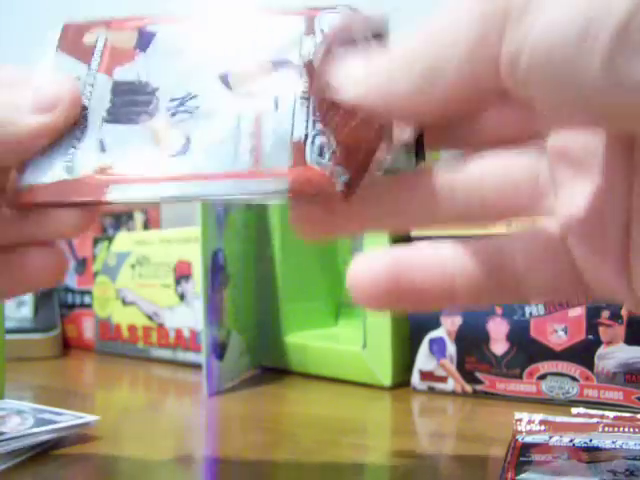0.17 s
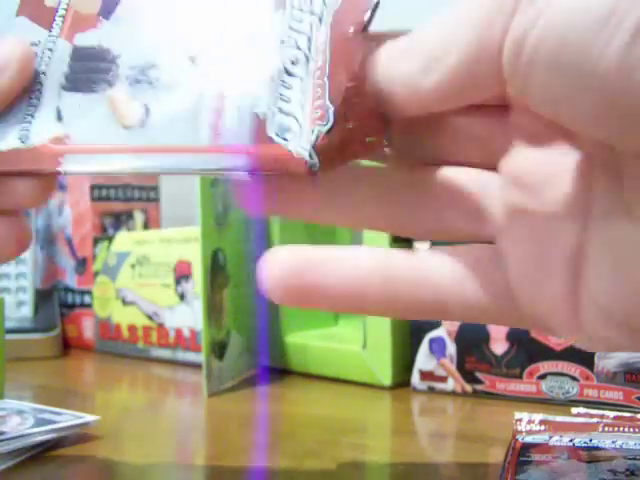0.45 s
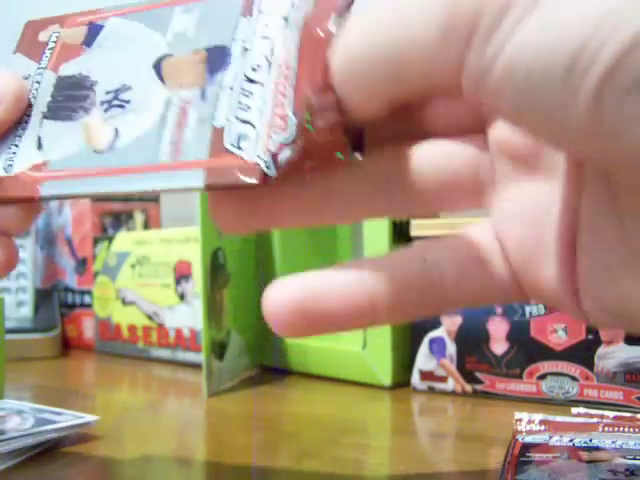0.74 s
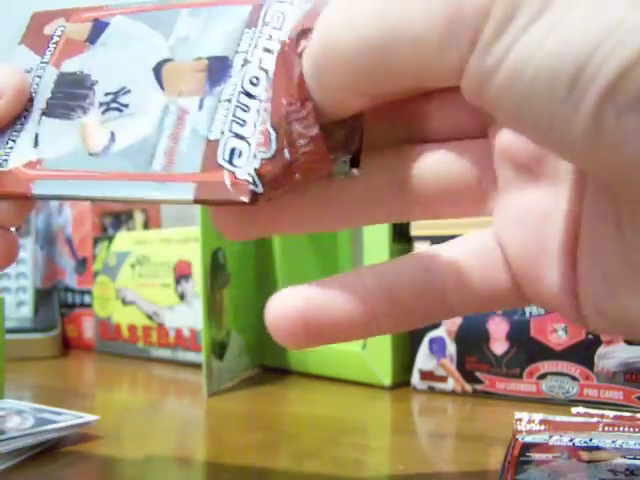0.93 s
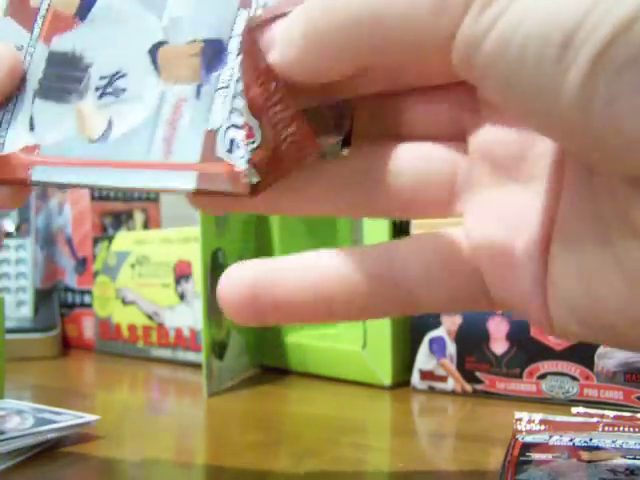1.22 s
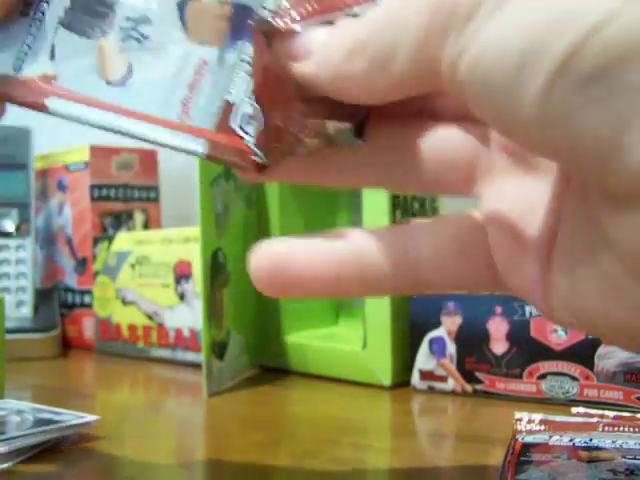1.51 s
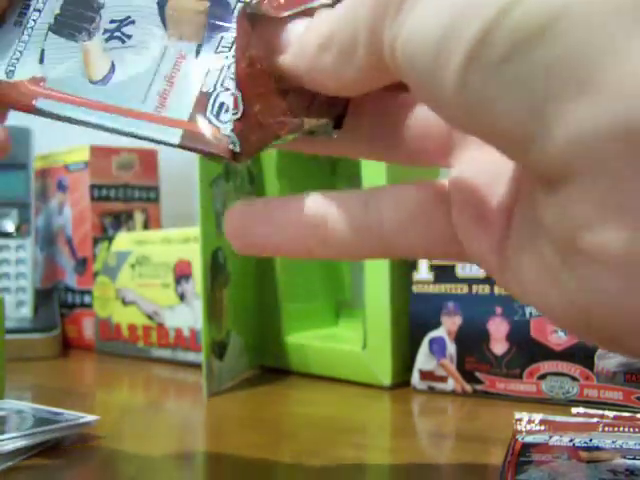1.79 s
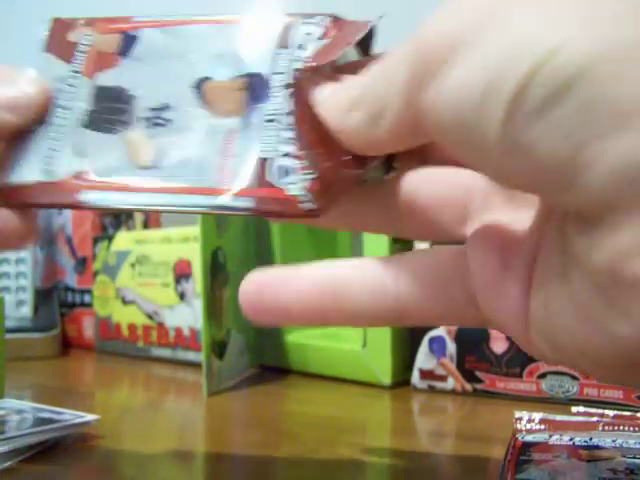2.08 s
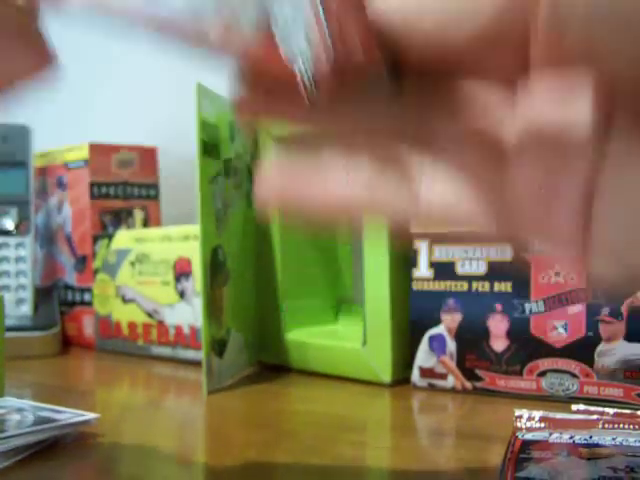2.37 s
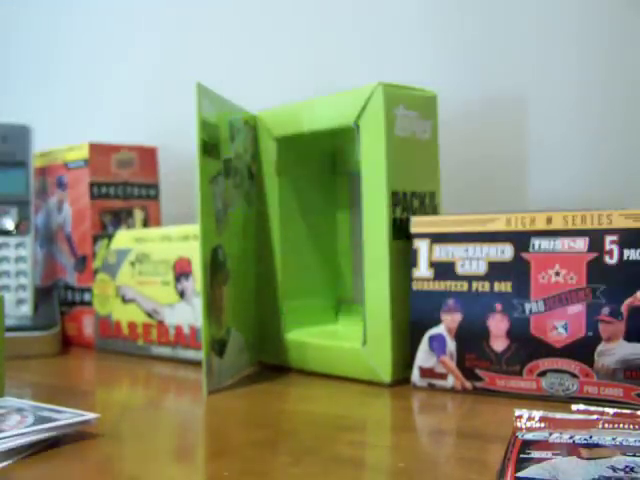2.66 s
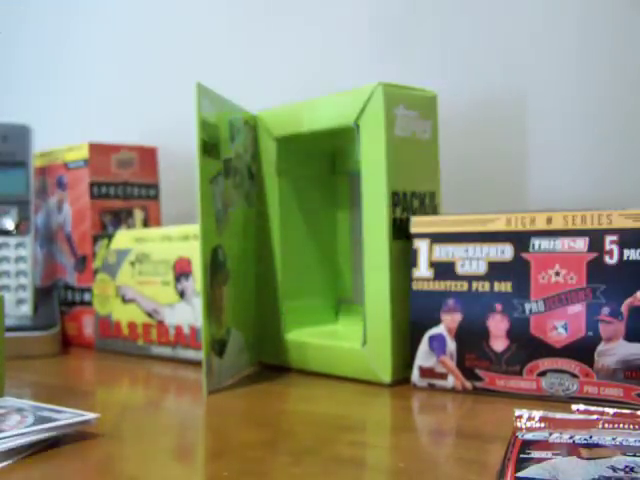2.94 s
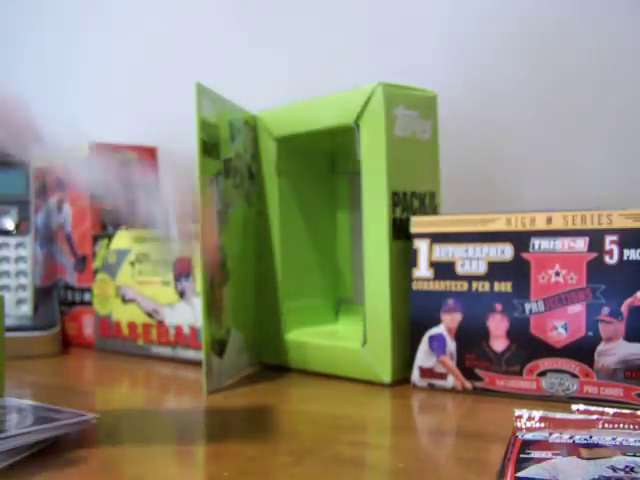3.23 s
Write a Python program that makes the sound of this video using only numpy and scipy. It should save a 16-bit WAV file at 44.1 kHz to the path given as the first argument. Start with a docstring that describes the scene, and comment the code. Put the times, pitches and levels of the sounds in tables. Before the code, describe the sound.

A foil card pack is opened by hand close to a small microphone in a small room: a hard seam crack early, scattered crinkles, a quiet lull, then dense snapping and final sliding rustles.

```python
"""Over a faint steady background, cards slide on foil, then sharp creases snap: a card pack is opened by hand.
It is close to a small microphone, over a table in a small room. Snaps are kicks ringing resonant foil facets,
pulls set off swarms of tiny kicks, slides are gritty noise, and buckling panels knock with short sine rings.
The seam is a burst of noise, fingertips rub as dull noise, and the room adds early reflections and a soft tail.
The hardest snaps overload the microphone."""
import sys
import numpy as np
from scipy import signal
from scipy.fft import rfft, irfft
from scipy.io import wavfile
from scipy.ndimage import uniform_filter1d

SR = 44100
rng = np.random.default_rng(int(sys.argv[2]) if len(sys.argv) > 2 else 0)


def bounce(signal):
    """Save signal as a 16-bit WAV file at the path given by the first command-line argument."""
    frames = np.transpose(np.atleast_2d(signal))
    limited = np.clip(frames, -1, 1)
    pcm = np.round(limited * 32767).astype(np.int16)
    wavfile.write(sys.argv[1], SR, pcm)


N = 147735
TIME = np.arange(N) / SR
HZ = np.fft.rfftfreq(2048, 1 / SR) + 1  # spectrum grid, kept above zero for the logarithms

LEAD = 260  # samples of creaking strain ahead of a crease's kick
FLUTTER_S, FLUTTER_DB = 0.0018, 10.5  # decay after the kick, energy against the kick
SNAP_S = 0.0043  # time over which a snap's level counts
RUB_ATTACK_S, RUB_RELEASE_S = 0.02, 0.012  # shared by slides and fingertips


def amp(db):
    """Decibels to gain."""
    return 10 ** (np.asarray(db) / 20)


def unit(x):
    """Scales to an energy of one."""
    return x / np.sqrt(np.sum(x ** 2) + 1e-20)


def read(points, hz):
    """Reads a table on a log-frequency axis."""
    f, value = np.transpose(points)
    return np.interp(np.log(hz + 1), np.log(f), value)


def add(mix, s, sound):
    """Mixes a sound in at time s, cutting it off at the end of the mix."""
    part = mix[max(round(s * SR), 0):][:len(sound)]
    part += sound[:len(part)]


def noise(hz, db, level=1):
    """White noise follows a level curve, then takes on the given spectrum."""
    gain = amp(np.interp(np.fft.rfftfreq(N, 1 / SR), hz, db))
    gain = unit(gain) * np.sqrt(len(gain))
    return irfft(rfft(level * rng.standard_normal(N)) * gain, N)


def gesture(start, length, attack, release):
    """A hand movement's envelope: rises, holds, then dies away."""
    rise = np.clip((TIME - start) / attack, 0, 1)
    return rise * np.exp(-np.maximum(TIME - start - length, 0) / release)


def colour(body_db, treble_db, body_hz=750, treble_hz=5300):
    """The foil's spectrum in dB, with a broad hump for body and a shelf for treble."""
    # colour of the foil at the microphone: frequency_hz [Hz], level_db [relative dB]
    foil = [(60, -35), (150, -21), (300, -19), (750, -11), (1100, -13), (1900, -7), (2500, -9), (3300, -1),
            (4200, -1.5), (5300, -5.5), (7000, -8), (8000, -19), (8700, -33), (9700, -70.5)]
    body = body_db * np.exp(-.5 * np.log2(HZ / body_hz) ** 2)
    treble = treble_db / (1 + (treble_hz / HZ) ** 10)
    return read(foil, HZ) + body + treble


def facet(ring_hz, body_db, treble_db, drive):
    """One stiff facet of foil, with its own broad resonance, answers a drive; energy one."""
    peak_db, width_octaves = 7, 0.21
    resonance = peak_db * np.exp(-.5 * (np.log2(HZ / ring_hz) / width_octaves) ** 2)
    db = colour(body_db, treble_db) + resonance
    # a minimum-phase response puts the energy at the front, so the attack stays crisp
    log_gain = np.log(amp(np.r_[db, db[-2:0:-1]]))
    click = np.fft.ifft(np.exp(np.conj(signal.hilbert(log_gain)))).real
    return unit(signal.fftconvolve(drive, click[:len(HZ)]))


def flip(size=700):
    """A crease creaks under strain, flips with one sharp kick LEAD samples in, then flutters."""
    strain_s, strain_db = 0.003, -9.5  # build-up time, energy against the kick
    t = (np.arange(size) - LEAD) / SR
    grit = rng.standard_normal(size)
    flutter = amp(FLUTTER_DB) * unit(grit * (t >= 0) * np.exp(-abs(t) / FLUTTER_S))
    strain = amp(strain_db) * unit(grit * (t < 0) * np.exp(-abs(t) / strain_s))
    kick = t == 0
    return (flutter + strain + kick) * rng.choice([-1, 1])


def background():
    """Steady noise with a fixed spectrum lies under everything."""
    # steady background: frequency_hz [Hz], density_db [relative dB per Hz]
    floor_shape = [(25, -4), (400, -3.5), (1000, -10.5), (2000, -8.5), (4000, -7), (7000, -15), (8300, -24),
                   (9500, -74)]
    return amp(-51.5) * noise(HZ, read(floor_shape, HZ))


def slides():
    """Cards and fingers slide on the foil: fine, gritty friction radiated by the wrapper."""
    # slides: start_s [s], length_s [s], level_db [dB before trim], treble_db [dB]
    slide_list = [(-.02, 0.06, -42.5, -5), (0.113, 0.23, -38.5, -5), (0.301, .17, -42.5, -2),
                  (0.506, .11, -35, 1.5), (0.728, 0.067, -36.5, 1), (0.872, 0.074, -37, -8),
                  (1.268, 0.051, -37.5, -3), (2.534, 0.086, -41.5, -6), (2.783, 0.067, -35, -1),
                  (2.915, 0.091, -32.5, -7.5), (3.097, 0.067, -41, -7.5), (3.175, 0.037, -42, 7)]
    body_db, rough_db, trim_db = -1.5, 4.5, -0.5
    # slowed noise, read as decibels, makes the friction catch and release
    wander = np.sqrt(N) * unit(uniform_filter1d(rng.standard_normal(N), size=70))
    grip = np.sqrt(N) * unit(amp(rough_db * wander))
    out = np.zeros(N)
    for start, length, db, treble in slide_list:
        stroke = gesture(start, length, RUB_ATTACK_S, RUB_RELEASE_S)
        out += noise(HZ, colour(body_db, treble), amp(db + trim_db) * grip * stroke)
    return out


def crackle(count=14):
    """Each pull crumples the foil, setting off a swarm of tiny snaps on facets of many sizes."""
    # pulls: start_s [s], length_s [s], level_db [dB], ring_hz [typical facet resonance, Hz]
    pulls = [(0.059, 0.044, -28.5, 4400), (.177, 0.106, -27, 3700), (0.299, 0.15, -35, 2700),
             (0.529, 0.068, -35, 2600), (1.302, 0.018, -20.5, 2450), (1.426, 0.034, -31, 2970),
             (1.507, 0.049, -33.5, 1960), (2.089, 0.053, -28, 2600), (2.244, 0.018, -27, 2900),
             (2.332, 0.074, -34.5, 3370), (2.609, 0.022, -22.5, 4500), (2.649, 0.058, -32, 5200),
             (2.705, 0.067, -22, 4600), (2.862, 0.15, -33, 3440), (2.985, 0.025, -25.5, 4800)]
    attack_s, release_s = 0.0008, .004
    crackles_per_s, reference_db = 420, -31.5  # harder pulls than the reference crackle faster
    spread_db, tilt_db = 7.5, 2  # variation in kick size, variation in body and treble
    middle_hz, body_db_per_octave = 3820, 3  # larger facets ring lower and have more body
    out = np.zeros(N)
    for start, length, db, hz in pulls:
        effort = gesture(start, length, attack_s, release_s)[round(start * SR):][:SR // 4]
        body = body_db_per_octave * np.log2(middle_hz / hz)
        rate = crackles_per_s * amp(db - reference_db)
        swarm = 0
        for _ in range(count):  # each facet takes its share of the kicks
            chance = rng.random(len(effort))
            size = np.minimum(rng.exponential(1, len(effort)), 2)
            kicks = effort * (chance < rate / count / SR) * amp(spread_db * size)
            ring, low, high = rng.standard_normal(3)
            ring_hz = hz * 2 ** (.5 * ring)
            tiny_snap = facet(ring_hz, body + tilt_db * low, tilt_db * high - 3, flip())
            swarm = swarm + signal.fftconvolve(kicks, tiny_snap)
        add(out, start - LEAD / SR, amp(db) * np.linalg.norm(effort) * unit(swarm))
    return out


def snaps():
    """Single creases flip over, each kick ringing its own facet of foil."""
    # creases: time_s [s], level_db [dB before trim], ring_hz [Hz], body_db [dB], treble_db [dB]
    creases = [(0.062, -17.5, 3600, 8.5, 6), (0.0709, -21, 5100, -3.5, 4), (0.0927, -21.5, 4700, -4, 9),
               (0.1263, -27, 4670, -6, 11.5), (0.2774, -15, 3160, 2, -7), (0.3527, -22.5, 2920, 11, 11),
               (0.3884, -20.5, 2880, -3, -11), (0.405, -15, 4700, -4, 1.5), (0.4191, -20.5, 3500, 8, 5),
               (0.5897, -25.5, 1950, 6, 1), (0.6122, -29, 5040.0, 2.5, 1), (0.654, -33.5, 4600, 8, 9),
               (0.682, -31.5, 3370, -3.5, -7), (0.8807, -21, 6200, 9, 13.5), (1.1931, -32.5, 3800, 2, 1.5),
               (1.3051, -20, 4300, -13, -9.5), (1.325, -23.5, 3470, -7, 0), (1.3494, -21.0, 3270, -6, 5),
               (1.3775, -15, 2580, 1, 1.5), (1.4259, -21, 5860, 6.5, 2), (1.4459, -22, 4830, 17, 9.5),
               (1.4968, -19.5, 3630, -3, 9), (1.5724, -18, 3300, -9, -6), (1.5812, -18.5, 4750, 3.5, 2),
               (1.6267, -26, 6060, 8, -1), (1.726, -32, 4610.0, 8, -3.5), (1.8237, -26, 5460, -3, 1),
               (1.953, -44, 5000, -8, 9), (2.006, -29, 5730, 4, 3.5), (2.0236, -24.5, 5770.0, 2.5, -3),
               (2.0581, -13.5, 3500, -17, -6), (2.1292, -10, 3720, -18, -6), (2.1683, -18, 2800, -5, 0.5),
               (2.209, -20.5, 5380.0, -2, 3), (2.2193, -18, 4200, 3.5, 5), (2.25, -17, 3100, -10, -7.5),
               (2.2649, -17, 4800, 1, 5), (2.317, -22, 3700, 3.5, 5), (2.3296, -22.5, 4100, 7, 3),
               (2.343, -17.5, 3160, 1, -1), (2.377, -20.5, 3600, 12, 2), (2.3893, -16, 3940, 2, 7),
               (2.453, -25.5, 6730, 3, 9.5), (2.4625, -24.5, 6030, -2, 2), (2.4751, -25, 4650.0, -8, 5),
               (2.4846, -26.5, 5560.0, -1.5, 4.5), (2.5071, -28, 7660, 4, 10.5),
               (2.5972, -22.5, 4290, -4, -2), (2.6329, -20.5, 760, 7, 2), (2.6793, -24.5, 4450, -18, 1),
               (2.6956, -13.5, 5220, -4, 7.5), (2.7102, -18.5, 3790.0, -16, -15),
               (2.7206, -15.5, 3120, -14, 0), (2.7332, -15, 3340, -10, -22.5),
               (3.0055, -16.5, 7100, 1.5, -4.5), (3.0572, -19, 3930, -15, -6), (3.179, -27, 5840, 2, 4.5),
               (3.2623, -32.5, 1450, 7.5, -31), (3.3242, -35, 1810.0, 15, -9)]
    trim_db = -0.5
    out = np.zeros(N)
    for s, db, hz, body, treble in creases:
        level = amp(db + trim_db) * np.sqrt(SNAP_S * SR)
        add(out, s - LEAD / SR, level * facet(hz, body, treble, flip()))
    return out


def pops():
    """A broad panel of the pack buckles: a small foil click and a short hollow ring."""
    # buckles: time_s [s], level_db [dB], ring_hz [Hz]
    buckles = [(.067, -38, 85), (0.183, -34, 79), (.183, -25.5, 1170), (.277, -29.5, 735),
               (.352, -30.5, 430), (.546, -35, 837), (0.596, -38.5, 710), (0.9039, -28.5, 1876),
               (1.362, -28.5, 1720), (1.3712, -35, 974), (1.578, -33, 472), (2.0596, -26, 2170),
               (2.121, -31.5, 840), (2.17, -23, 1960), (2.425, -35, 1810), (2.62, -34, 776),
               (2.72, -40.5, 233), (2.877, -27.5, 1070)]
    ring_s = .0014  # both the swell and the decay of the knock
    click_db = 1  # crisp foil against the hollow knock
    t = TIME[:len(HZ)]
    out = np.zeros(N)
    for s, db, hz in buckles:
        level = amp(db) * np.sqrt(SNAP_S * SR)
        knock = np.sin(2 * np.pi * hz * t) * t / ring_s * np.exp(-t / ring_s)
        add(out, s, level * unit(knock))
        add(out, s - LEAD / SR, level * amp(click_db) * facet(hz, 0, -5.5, flip()))
    return out


def seam():
    """The seam gives way in one hard crack: a brief burst of noise rings a facet."""
    # seam: time_s [s], level_db [dB], ring_hz [Hz], body_db [dB], treble_db [dB], length_s [s]
    s, db, hz, body, treble, length = (.1823, -6, 3400, -7, -4, .0036)
    burst = gesture(0, length, 1 / SR, FLUTTER_S / 2)[:len(HZ)]
    rip = rng.standard_normal(len(HZ)) * burst
    out = np.zeros(N)
    add(out, s, amp(db) * np.sqrt(length * SR) * facet(hz, body, treble, rip))
    return out


def fingers():
    """Fingertips shift their grip: dull, soft rubs of skin on the wrapper."""
    # grips: start_s [s], length_s [s], level_db [dB], ring_hz [broad hump of the pack, Hz]
    grips = [(0.944, 0.73, -55.5, 800), (2.315, 0.21, -49.5, 399), (2.585, .17, -45.5, 342)]
    out = np.zeros(N)
    for start, length, db, hz in grips:
        hump_db = 20 * np.log10(HZ / hz / (1 + (HZ / hz) ** 4))
        stroke = gesture(start, length, RUB_ATTACK_S, RUB_RELEASE_S)
        out += noise(HZ, hump_db, amp(db) * stroke)
    return out


def room(x):
    """A few early reflections and a diffuse noise tail that dies band by band."""
    # decay: frequency_hz [Hz], t60_s [s to fall 60 dB]
    decay = [(200, 0.77), (1000, 0.45), (3500, 0.78), (8000, 0.41)]
    # early reflections: delay_s [s], level_db [dB]
    echoes = [(.0093, -16), (0.0417, -21)]
    tail_db, bass_db, treble_db = -13.5, -3.5, -3
    hz, t, z = signal.stft(rng.standard_normal(SR), SR, nperseg=256)
    hz = hz[:, None]
    fall_db = -60 * t / read(decay, hz)
    tint_db = bass_db / (1 + (hz / 2500) ** 4) + treble_db / (1 + (6000 / (hz + 1)) ** 4)
    tail = signal.istft(z * amp(fall_db + tint_db), SR, nperseg=256)[1][:SR]
    build_up = np.clip(TIME[:SR] / 0.0037, 0, 1)
    response = amp(tail_db) * unit(tail * build_up)
    for delay, db in echoes:
        add(response, delay, amp([db]))
    return signal.fftconvolve(x, response)[:N]


def scene():
    """The pack, its room and the steady background."""
    pack = slides() + crackle() + snaps() + pops() + seam() + fingers()
    return (pack + room(pack) + background())[None]


def record(dry):
    """The hardest snaps hit the ceiling of the microphone; then the band limit."""
    ceiling, edge_hz = 0.78, 16600  # ceiling in linear amplitude
    held = dry / (1 + (dry / ceiling) ** 16) ** (1 / 16)
    lowpass = signal.firwin(511, edge_hz, window=("kaiser", 9), fs=SR)
    return signal.oaconvolve(held, lowpass[None], "same")


dry = scene()
out = record(dry)
bounce(out)
```